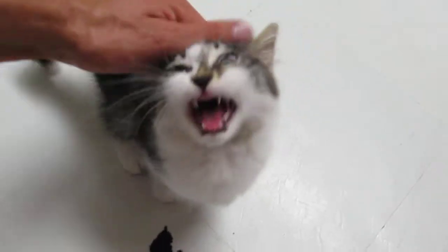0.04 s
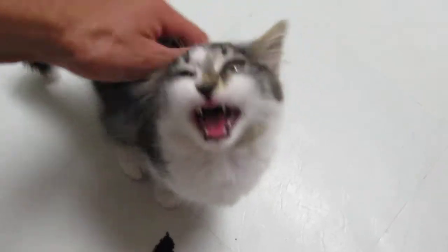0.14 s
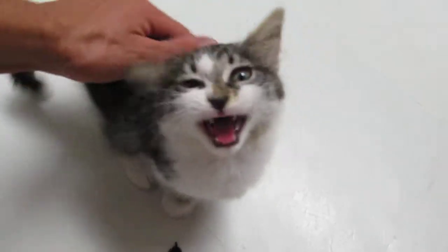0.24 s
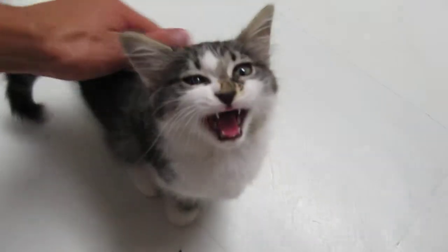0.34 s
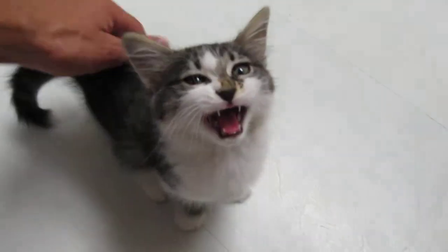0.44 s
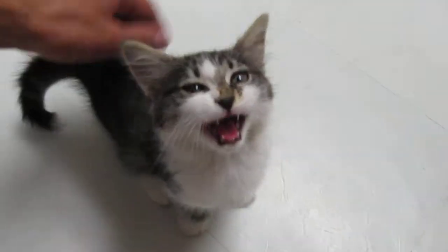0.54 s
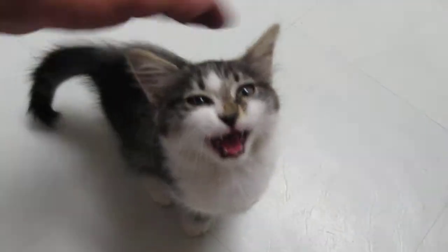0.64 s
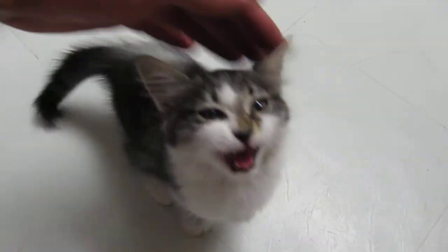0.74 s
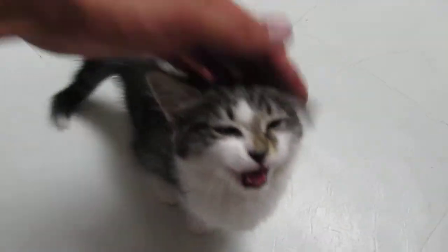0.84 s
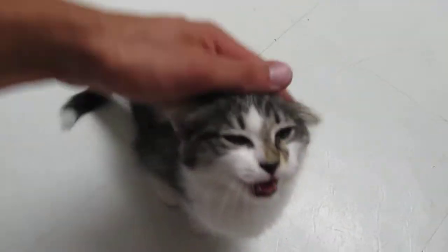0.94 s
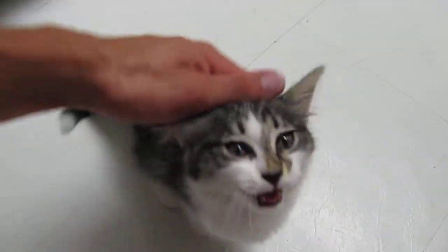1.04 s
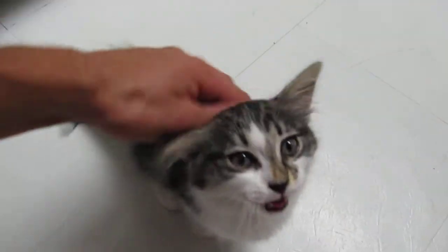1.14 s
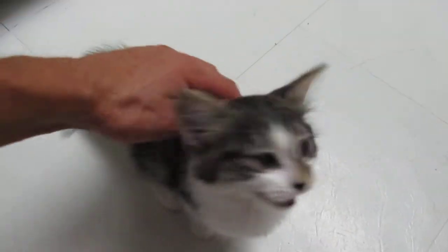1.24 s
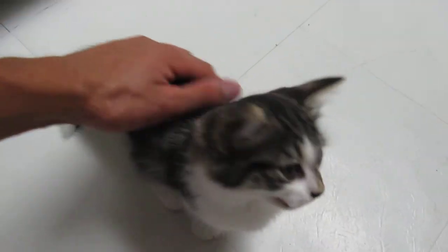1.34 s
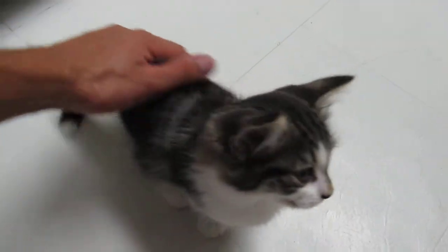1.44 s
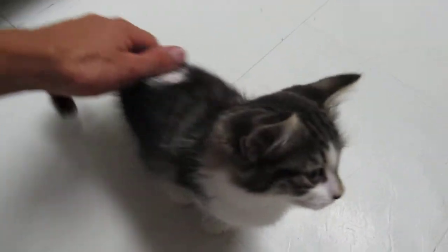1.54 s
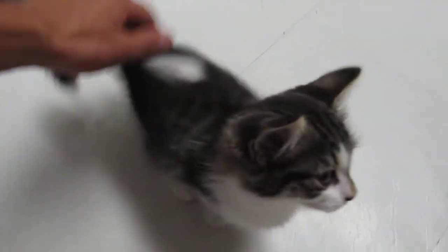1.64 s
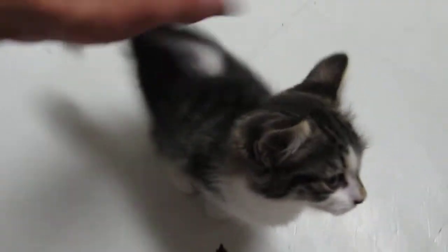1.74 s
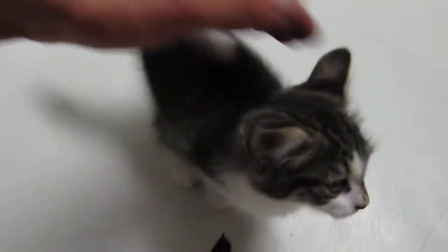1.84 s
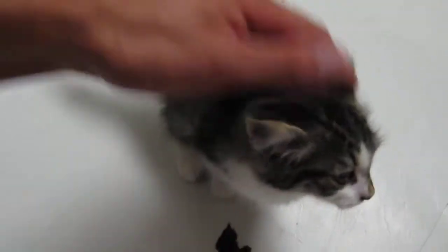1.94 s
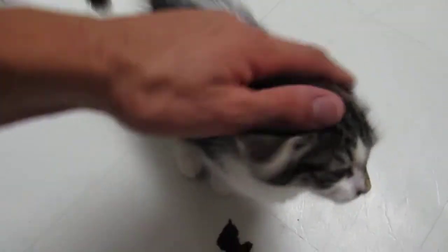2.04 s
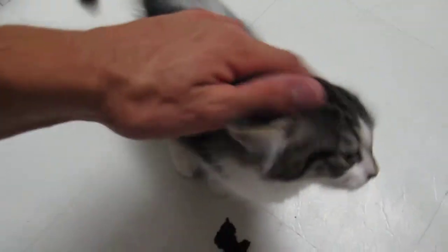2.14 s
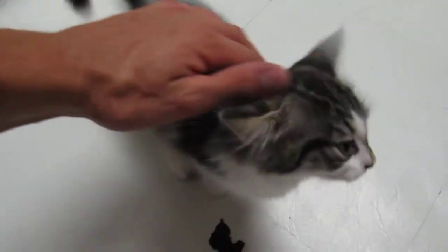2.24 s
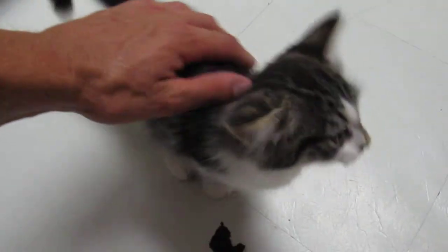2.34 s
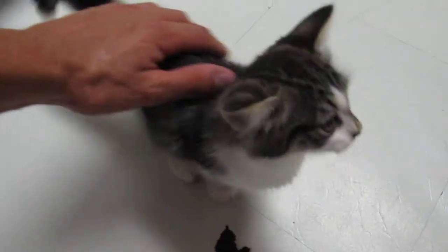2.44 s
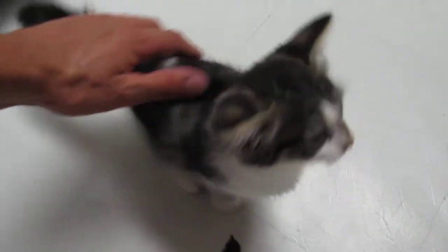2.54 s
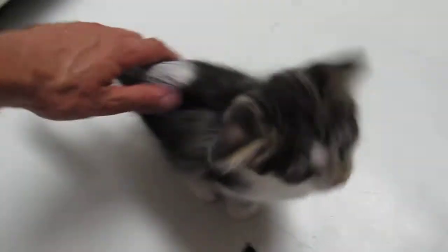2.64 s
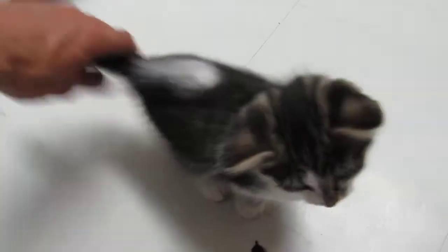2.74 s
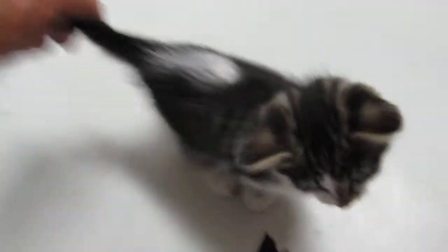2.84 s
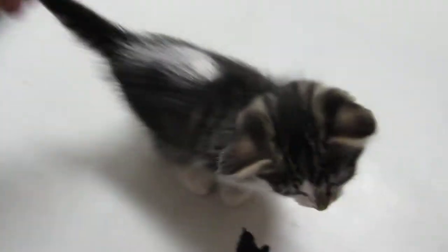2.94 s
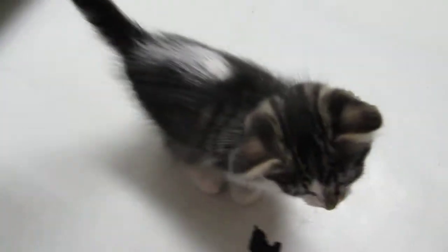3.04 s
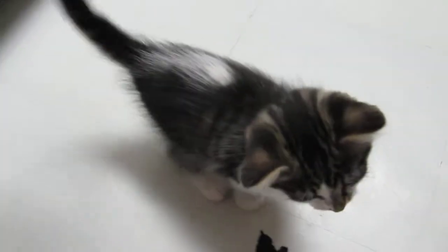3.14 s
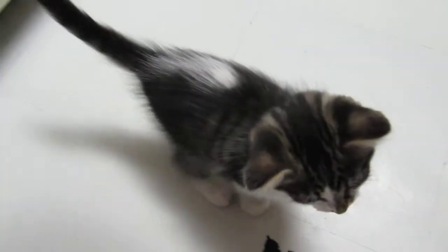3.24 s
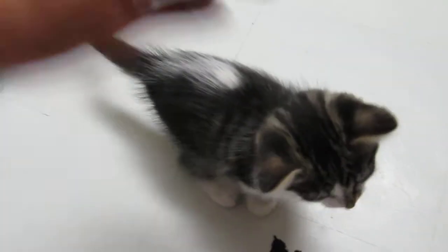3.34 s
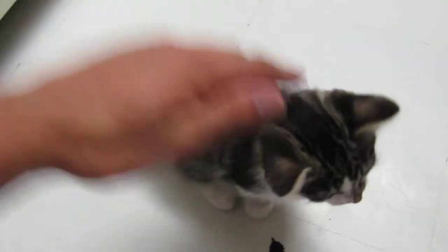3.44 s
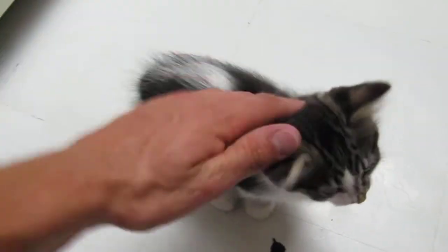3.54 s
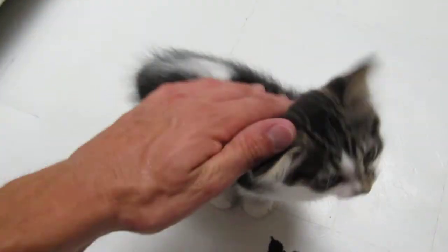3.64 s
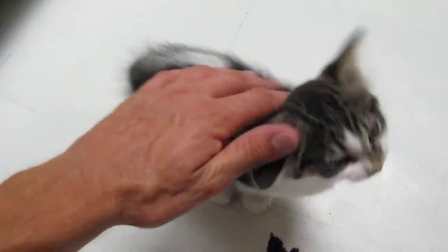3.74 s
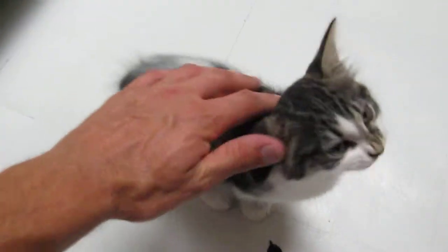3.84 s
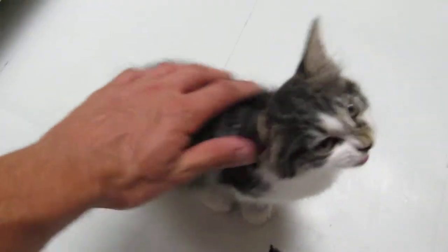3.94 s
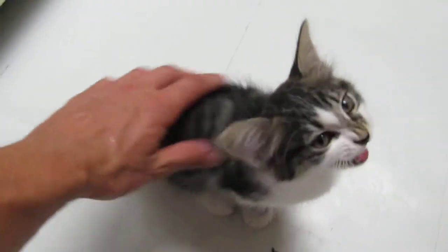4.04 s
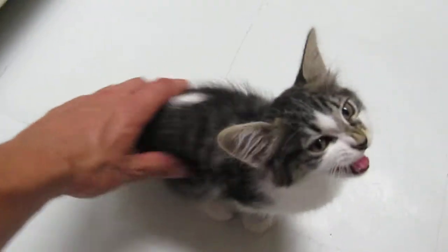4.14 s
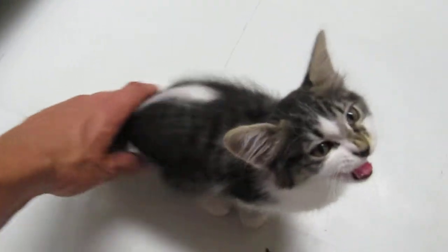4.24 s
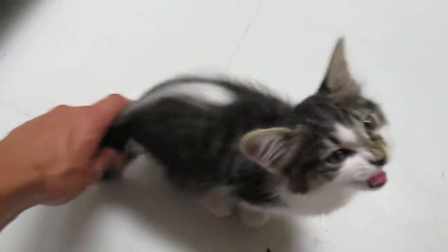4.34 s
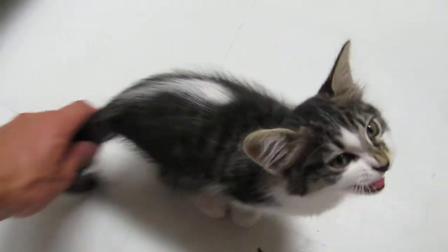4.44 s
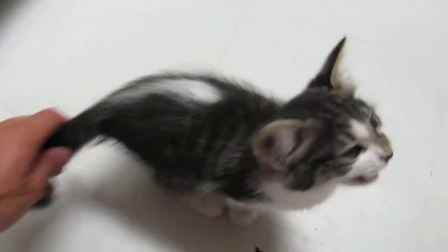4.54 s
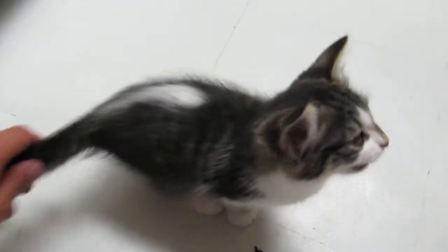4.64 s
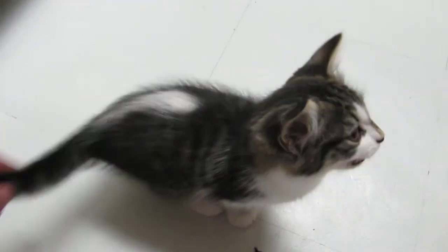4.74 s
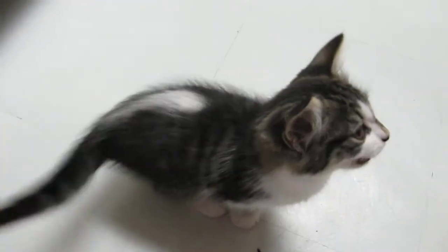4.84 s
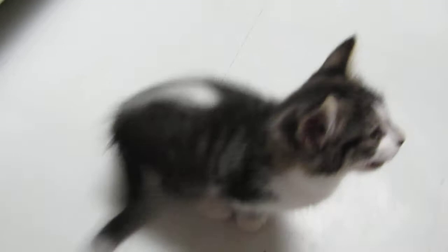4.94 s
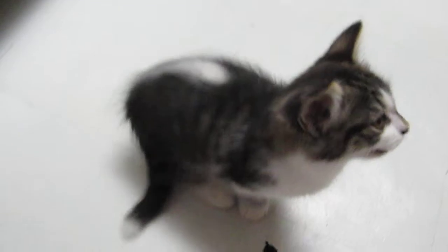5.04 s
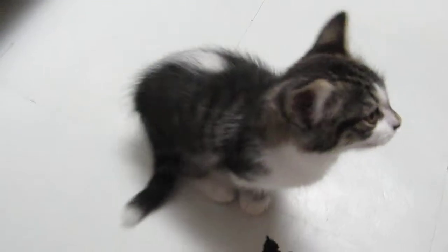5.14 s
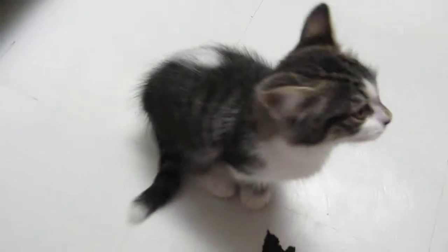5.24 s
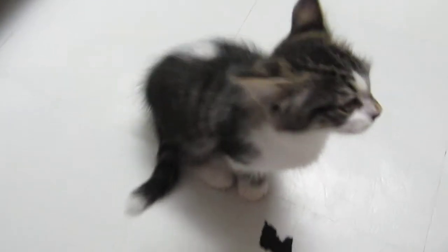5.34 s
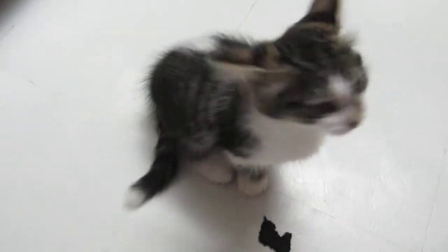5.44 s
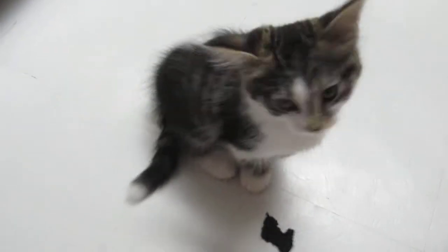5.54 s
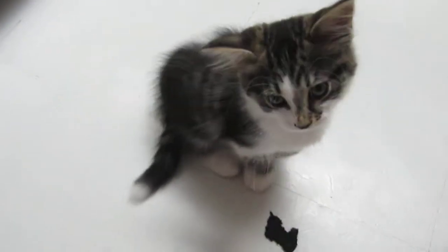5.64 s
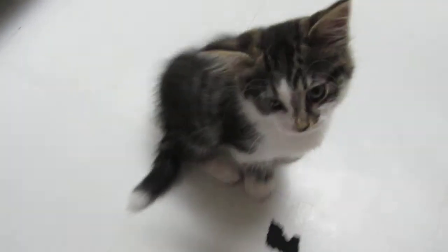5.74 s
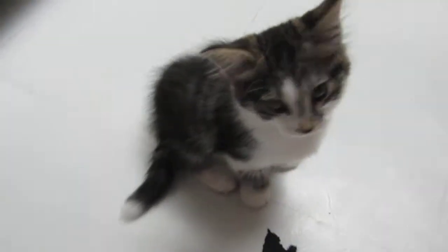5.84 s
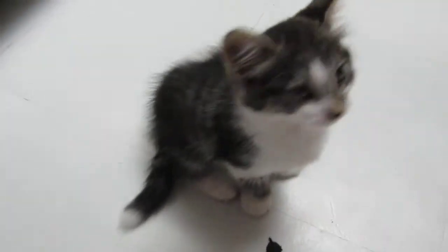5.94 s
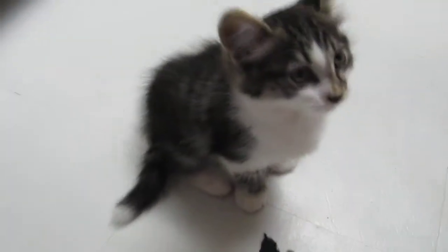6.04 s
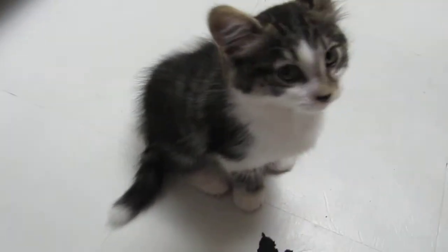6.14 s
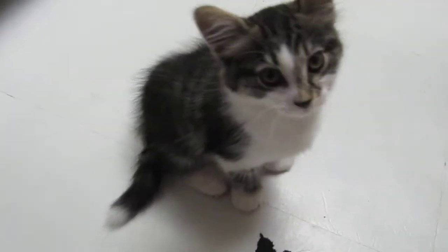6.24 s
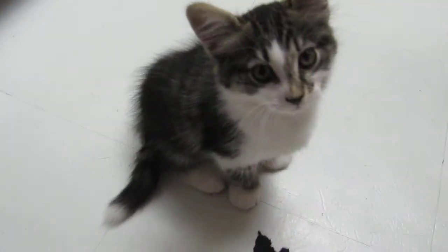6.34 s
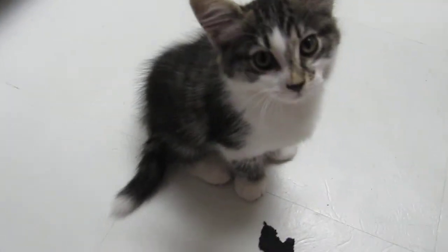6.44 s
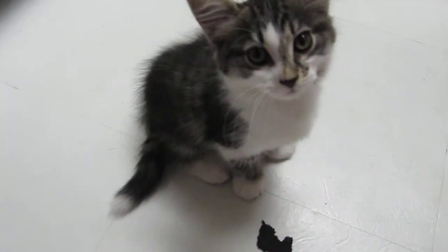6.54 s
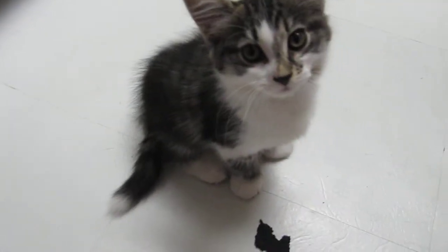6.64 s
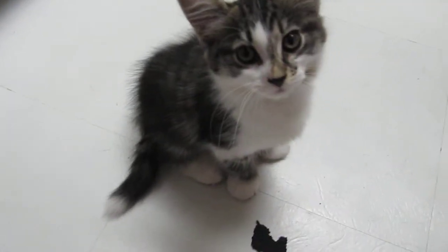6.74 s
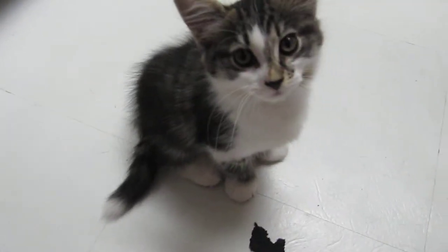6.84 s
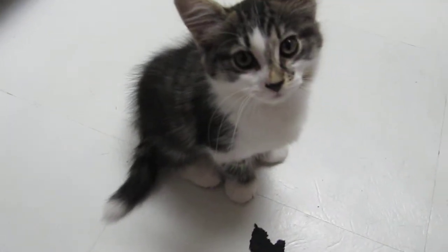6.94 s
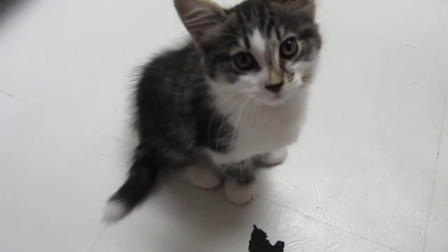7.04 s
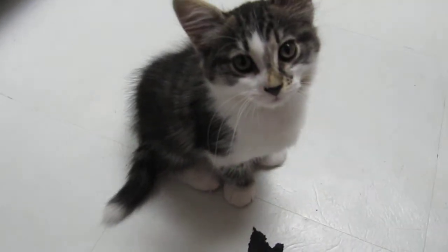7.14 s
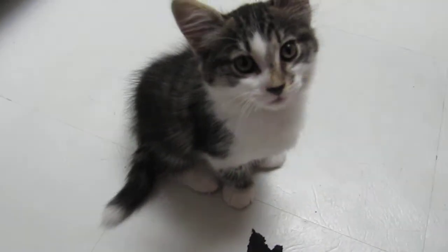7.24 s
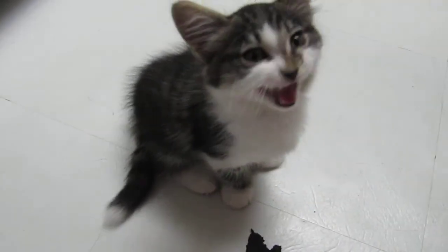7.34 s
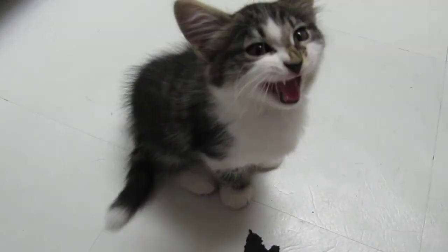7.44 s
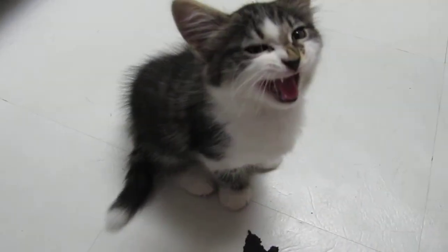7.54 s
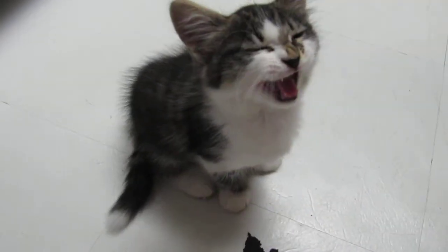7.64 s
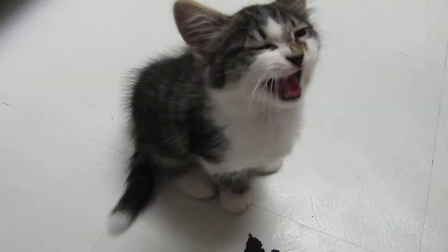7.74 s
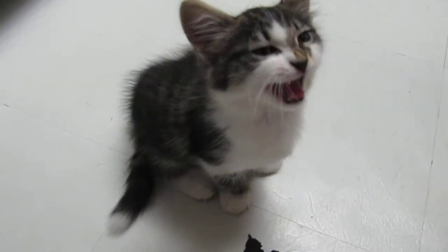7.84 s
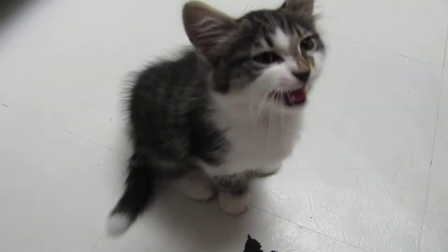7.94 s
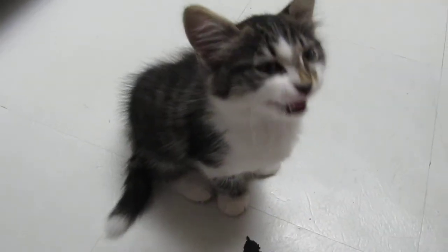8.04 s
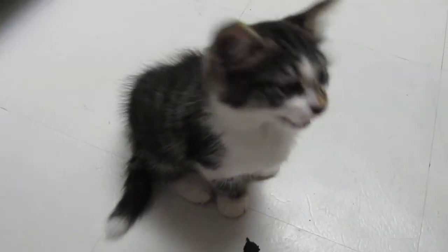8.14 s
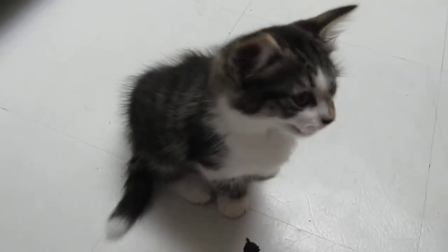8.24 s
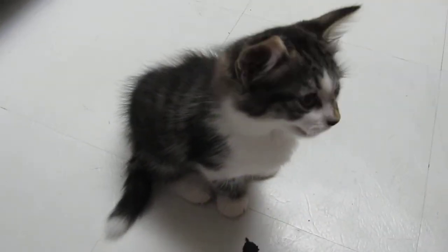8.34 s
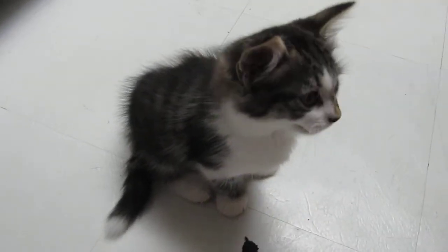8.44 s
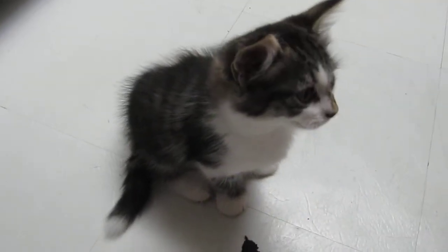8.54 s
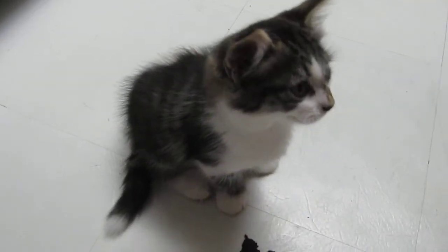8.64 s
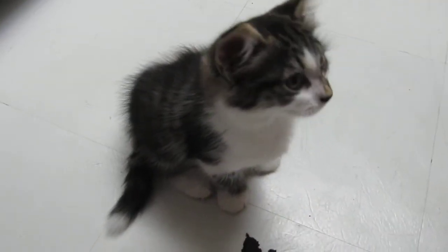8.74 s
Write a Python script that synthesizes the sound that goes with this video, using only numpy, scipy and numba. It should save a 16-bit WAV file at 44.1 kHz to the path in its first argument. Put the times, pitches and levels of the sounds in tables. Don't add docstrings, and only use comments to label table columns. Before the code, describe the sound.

A small kitten meows close to the microphone in a bare, slightly reflective room. The first cry is already under way and falls away; soft hand strokes on fur and small wet mouth ticks follow. A second strong meow comes with a dull knock under it, then a brief rough chirp, a sharp tick and a last falling meow. Low ventilation noise, wavering motor hum and a faint high whine continue throughout.

```python
import sys
import numpy as np
from scipy import signal
from scipy.fft import rfft, irfft
from scipy.io import wavfile
from scipy.ndimage import uniform_filter1d
from numba import njit

SR = 44100
rng = np.random.default_rng(int(sys.argv[2]) if len(sys.argv) > 2 else 0)


def invert_db(x):
    u = np.asarray(x, float) / 20
    return 10 ** u


def store_wav(level_fs):
    pcm = np.round(np.clip(np.atleast_2d(level_fs), -1, 1) * 32767)
    wavfile.write(sys.argv[1], SR, pcm.T.astype(np.int16))


N = 387198


@njit
def svf(x, hz, width):
    y, band_state, low_state = np.empty(len(x)), 0., 0.
    for i in range(len(x)):
        g, k = np.tan(np.pi * hz[i] / SR), width / hz[i]
        v = (band_state + g * (x[i] - low_state)) / (1 + g * (g + k))
        band_state, low_state = 2 * v - band_state, low_state + 2 * g * v
        y[i] = k * v
    return y


def band(x, hz, width, count=2):
    for _ in range(count):
        x = svf(x, hz + np.zeros(len(x)), float(width))
    return x


def walk(rate, size=N):
    hold = max(int(SR / rate), 2)
    levels = np.repeat(rng.standard_normal(size // hold + 1), hold)
    return 1.4 * uniform_filter1d(uniform_filter1d(levels, hold), hold)[:size]


def steady(x):
    power = uniform_filter1d(uniform_filter1d(x ** 2, size=900), size=900)
    return x / np.sqrt(power + 1e-12)


# frequency in Hz, density in dB per Hz.
AIR_SPECTRUM = [(15, -1), (35, -9), (227, -2), (281, -4.5), (399, -5.5), (631, -4.5), (848, -13),
                (1050, -13), (2170, -23), (4150, -25.5), (6040, -30), (7290, -28), (8120, -31), (8800, -26),
                (15500, -46)]
# frequency in Hz, rms level in dB, wobble in dB.
LINES = [(120, -54, 3), (179, -59, 3), (238, -53, 3), (360, -62, 3), (411, -56, 2), (2374, -76, 2),
         (4113, -77, 2), (4172, -77, 2), (7795, -79, 1), (7822, -76, 1), (7854, -72, 2), (7881, -66, 1),
         (7940, -75, 1), (8000, -78, 1)]
# time in seconds, level in dB.
MOTOR_LOAD = [(0.0, -60), (0.12, -57), (1.3, -55), (1.96, -47.5), (2.2, -56), (3.06, -48), (3.42, -63),
              (3.62, -51), (4.5, -61), (4.96, -49), (5.31, -57), (6.11, -49), (6.68, -60), (6.92, -52),
              (7.36, -50.5), (7.68, -61), (7.82, -52), (8.78, -55)]
AIR_DB, MOTOR_HZ = -45, 59.2


def hum():
    hz = np.maximum(np.fft.rfftfreq(N, 1 / SR), 1)
    corner_hz, density_db = np.transpose(AIR_SPECTRUM)
    colour = invert_db(np.interp(np.log(hz), np.log(corner_hz), density_db))
    air = irfft(rfft(rng.standard_normal(N)) * colour, N) * invert_db(.5 * walk(1.68))
    out = air * invert_db(AIR_DB) / np.std(air)
    t = np.arange(N) / SR
    for hz, db, wobble_db in LINES:
        level = np.sqrt(2) * invert_db(db + wobble_db * walk(6.0))
        out += level * np.sin(2 * np.pi * hz * t + wobble_db / 2 * walk(10))
    throb = invert_db(np.interp(t, *np.transpose(MOTOR_LOAD)) + 0.6)
    return out + np.sqrt(2) * throb * np.sin(2 * np.pi * MOTOR_HZ * t + 0.56 * walk(2.14))


# start in seconds, peak level in dB, frequency in Hz.
TICKS = [
    (2.055, -38, 2870),
    (2.2513, -23, 3470),
    (4.996, -29, 8970),
    (7.2467, -17, 3100),
    (8.401, -31, 4610),
]


def ticks():
    out, t = np.zeros(N), np.arange(8000) / SR
    for s, db, hz in TICKS:
        decay = invert_db(db - 60 * t / .02)
        tick = band(rng.standard_normal(len(t)) * decay, hz, .8 * hz)
        out[int(s * SR):int(s * SR) + len(t)] += 0.55 * tick
    return out


KNOCK_S = 4.258
# level in dB, frequency in Hz, 60 dB decay time in seconds.
KNOCK = (-28, 75, 0.054)


def knock():
    out, t = np.zeros(N), np.arange(8000) / SR
    db, hz, t60 = KNOCK
    crack = band(rng.standard_normal(len(t)), 10500, 14000, count=1) * invert_db(-5 - 60 * t / 0.03)
    start = int(KNOCK_S * SR)
    out[start:start + len(t)] += (np.sin(2 * np.pi * hz * t) + crack) * invert_db(db - 60 * t / t60)
    return out


# peak in seconds, level in dB, length in seconds, centre in Hz.
STROKES = [
    (1.299, -60, 0.065, 4970),
    (1.413, -56.5, .15, 6930),
    (2.002, -58, .2, 7770),
    (2.16, -60, .08, 7800),
    (2.312, -46, 0.27, 7350),
    (2.627, -40.5, 0.19, 8100),
    (2.792, -46, 0.14, 6900),
    (5.014, -48.5, 0.086, 4930),
]
STROKE_RISE, STROKE_EDGE_DB = 0.38, -21.5


def fur():
    out = np.zeros(N)
    lead = 8000
    t = np.arange(-lead, 12000) / SR
    for s, db, length, hz in STROKES:
        off_peak = t / length / np.where(t < 0, STROKE_RISE, 1 - STROKE_RISE)
        grains = rng.standard_normal(len(t)) * invert_db(1.1 * walk(300, size=len(t)))
        hiss = band(grains, hz, 13600, count=3) + invert_db(1.5) * band(grains, 4050, 5000, count=1)
        start = int(s * SR) - lead
        out[start:start + len(t)] += invert_db(db + STROKE_EDGE_DB * off_peak ** 2) * steady(hiss)
    return out


# start in seconds, roughness from 0 to 1.
REGISTERS = [(0, .13), (.325, .24), (.385, .07), (.47, .18), (.52, .09), (.63, .05), (.86, .2), (.92, .07),
             (1.3, .3), (3.635, .09), (3.72, .4), (3.815, .6), (3.975, .45), (4.075, .1), (4.39, .045),
             (4.82, .12), (4.9, .3), (5.5, .85), (5.82, .25), (5.895, .75), (5.93, .25), (5.995, .45),
             (6.04, .7), (6.08, .06), (7, .45), (7.38, .48), (7.5, .68), (7.625, .36), (7.69, .05),
             (8.05, .17)]
# start in seconds, end in seconds, dB against the main partials.
DOUBLINGS = [(0, .4, -2.5), (.4, 0.469, -11), (.46, 0.505, -5), (.5, 0.627, -14), (.86, 0.908, -9),
             (0.973, 1.1, -6), (1.11, 1.167, -0.5), (3.813, 4.153, 4), (4.15, 4.392, -7),
             (5.89, 5.928, -12), (5.965, 6.078, -4.5), (7.375, 7.503, -8), (7.506, 7.635, 1.5),
             (7.63, 7.696, -8.5)]
LOCKED_DB, SLIP_S = -38, 0.012


def folds(t, hz):
    size = len(t)

    def slide(v):
        return uniform_filter1d(v, size=max(int(SLIP_S * SR), 1))

    since, roughness = np.transpose(REGISTERS)
    rough = slide(roughness[np.searchsorted(since, t, "right") - 1])
    doubling_db = np.full(size, 1. * LOCKED_DB)
    for s0, s1, db in DOUBLINGS:
        doubling_db[(t >= s0) & (t < s1)] = db
    doubling = invert_db(slide(doubling_db))
    hops = uniform_filter1d(np.repeat(rng.standard_normal(size // 800 + 1), 800)[:size], size=150)
    jitter = 1 + .003 * walk(60, size=size) + .022 * rough * hops
    phase = np.pi * np.cumsum(hz * jitter) / SR
    shaken = phase + (.008 + .1 * rough) * walk(500, size=size)
    pulses = 0
    for k in range(1, 58):
        looseness = min(k / 8, 1)
        scatter = rough * looseness ** 2
        drift = invert_db(2.2 * looseness * walk(12, size=size) + 6 * scatter * walk(250, size=size))
        slip = rng.uniform(0, 3) + 1.5 * scatter * walk(300, size=size)
        level = doubling * min(k / 5, 1) if k % 2 else 1
        pulses = pulses + level * (k * hz < 32000) * drift * np.cos(k * shaken + slip)
    leak = (1 + .6 * np.cos(2 * phase)) * (.25 + 3.7 * rough ** 2)
    air = rng.standard_normal(size) * leak
    return pulses * invert_db(3 * rough * walk(200, size=size)) + air


TAIL_TOP = 0.62


def vocal_tract(source, hz, mouth_hz, lost_db, gape, teeth_hz):
    gape_db, gape_hz, top_db, third_db, nose_hz = gape
    mouth = band(source, mouth_hz, 955, count=3) + invert_db(gape_db) * band(source, gape_hz, 1510, count=3)
    throat = band(source, 2 * hz, 1090) - invert_db(third_db) * band(source, 3 * hz, 220)
    throat = throat + invert_db(-7.5) * band(source, hz, 200)
    nose = band(source, nose_hz, 3310, count=3)
    breath = source + 0.85 * rng.standard_normal(len(source))
    teeth = band(breath, teeth_hz, 4300, count=6) + invert_db(-8) * band(breath, 8700, 3200, count=3)
    teeth = teeth + invert_db(top_db + TAIL_TOP * lost_db) * band(breath, 13500, 2600)
    return steady(mouth), steady(throat), steady(nose), steady(teeth)


def played(table):
    s, *columns = np.transpose(table)
    t = np.arange(int(s[0] * SR), int(s[-1] * SR)) / SR
    under_way = s[0] < .001
    edge = np.clip(np.minimum(t - s[0] + under_way, s[-1] - t) / .008, 0, 1)
    return int(s[0] * SR), t, edge, [np.interp(t, s, c) for c in columns]


# time in seconds, effort in dB, mouth resonance in Hz (opening),
# throat over mouth in dB (jaw closure).
MEOWS = [
    [(0.0, -30, 3040, -5.5), (0.12, -26.5, 2990, -9), (0.42, -25, 3030, -12), (0.66, -32, 2576, -6),
     (0.8, -35, 2524, -7.5), (0.934, -41, 2800, -5.5), (1.064, -38, 2810, -16), (1.23, -39.5, 2703, -7.5),
     (1.4, -63.5, 2494, 9)],
    [(3.6, -63, 3020, 14), (3.66, -36.5, 3300, -17), (3.784, -27.5, 3140, -14), (4.012, -24.5, 3530, -12),
     (4.274, -24.5, 3000, -13), (4.516, -27, 2970, -13), (4.63, -40, 2860, 2), (4.842, -41.5, 2500, -6),
     (4.97, -56, 2500, -2)],
    [(7.268, -44, 3200, -7), (7.31, -31.5, 3830, -17.5), (7.4, -28, 3720, -13), (7.64, -25, 3220, -12.5),
     (7.87, -27.5, 2830, -8.5), (7.94, -38, 2650, 2), (8.05, -40, 2440, -7), (8.1, -46.5, 2580, -1.5),
     (8.41, -62, 2200, 7)],
]
CHIRP = [
    [(5.73, -72, 2300, 13), (5.79, -56, 2500, 10), (5.82, -46.5, 2160, 2), (5.846, -37.5, 2250, -2),
     (5.87, -60, 2200, 6)],
    [(5.87, -58, 2160, 12), (5.892, -37.5, 2180, 1), (5.908, -26, 2250, -14), (5.93, -31.5, 2440, -4.5),
     (5.964, -25.5, 2970, -15), (5.99, -29.5, 2820, -12), (6.005, -26.5, 2650, -22),
     (6.06, -32.5, 2620, -14), (6.078, -38, 2690, -12)],
    [(6.078, -52, 2600, 1), (6.184, -59, 2680, 9), (6.255, -75, 2640, 19), (6.28, -78, 2720, 5)],
]
# time in seconds, pitch in Hz.
PITCH = [
    [(0.05, 697), (0.2, 733.7), (0.46, 729.4), (0.5, 702.6), (0.63, 645), (0.84, 597), (0.9, 596),
     (1.0, 574), (1.276, 578.3)],
    [(3.66, 630), (3.72, 622), (3.814, 808), (4.0, 793.7), (4.235, 693), (4.33, 736.3), (4.52, 720.7),
     (4.6, 675), (4.8, 621)],
    [(7.315, 609.5), (7.361, 641), (7.387, 732), (7.57, 784.6), (7.63, 736), (7.77, 727), (7.96, 636.5),
     (8.2, 524.7), (8.42, 468)],
    [(5.72, 518), (5.826, 533), (5.87, 576)],
    [(5.87, 595), (5.92, 586), (5.958, 641), (5.99, 650), (6.01, 725), (6.06, 705), (6.078, 740)],
    [(6.078, 827), (6.178, 848), (6.2, 892), (6.3, 890)],
]
# second mouth resonance in dB, its frequency in Hz, top air in dB,
# third partial in dB, nose resonance in Hz.
GAPE = [
    (-8, 3680, -24, 2.5, 5000),
    (-3.5, 3340, -28, -1, 5100),
    (-6, 3300, -25, 1.5, 5030),
    (-13, 3150, -38, -17, 5900),
    (1.5, 2420, -38, -21, 5730),
    (2, 4340, -38, -24, 6200),
]
# nose in dB and teeth in dB at full effort,
# dB the nose and dB the teeth win per dB of lost effort, teeth resonance in Hz.
TRACT = [
    (-14, -15.5, 0.17, 0.22, 10840),
    (-12, -16.5, 0.079, 0.081, 10700),
    (-9.5, -14.5, .1, 0.17, 10940),
    (-34, -40, 0, 0, 10500),
    (-17.5, -29.5, 0.057, 0, 9900),
    (-12, -32, .15, .1, 10500),
]
# time in seconds, pitch bump in Hz, effort bump in dB, half width in seconds.
QUAVERS = [(0, 24, -1.5, 0.034), (0.138, 10, 0, 0.013), (0.251, -9, 0, 0.033), (0.351, -7, 1.5, 0.014),
           (.485, -14.5, 1, 0.013), (.535, 1, -1.5, .01), (.57, 12, 0.5, 0.031), (.835, -12, -1.5, 0.018),
           (1.125, 20.5, 1.5, .035), (1.36, -60.5, -0.5, .06), (3.66, 10.5, 4, 0.016),
           (3.734, 25.5, -1.5, 0.0122), (3.774, -25, -2, 0.017), (3.8, 5.5, 2.5, .012),
           (3.858, -25, -1, .015), (4.12, 0, 0, 0.046), (4.225, -1, -4, 0.077), (4.845, -24.5, -0.5, 0.035),
           (4.915, -23, 1, 0.0154), (7.396, 9, 3, 0.011), (7.42, -20.5, 0.5, .02), (7.59, -11, -1, 0.027),
           (7.66, -0.5, 0.5, .02), (7.76, -4, 0.5, 0.014), (7.8, 9, 1.5, 0.021), (7.855, 0, 0, 0.011),
           (7.99, 9, 2.5, 0.02), (8.094, -19.5, -1, 0.025), (8.13, 12, 0, 0.013), (8.28, 8, 5, 0.0506)]
RISE_HZ_PER_S, SAG_HZ_PER_S = 2300, 700
FULL_DB = -25
BITE_DB, BITE_S = 6, 0.13


def kitten():
    out = np.zeros(N)
    for cry, pitch, gape, tract in zip(MEOWS + CHIRP, PITCH, GAPE, TRACT):
        start, t, edge, (db, mouth_hz, throat_db) = played(cry)
        s, pitch_hz = np.transpose(pitch)
        early = np.clip(s[0] - t, 0, 1) * (start > 0)
        late = np.clip(t - s[-1], 0, 1)
        hz = np.interp(t, s, pitch_hz) - RISE_HZ_PER_S * early - SAG_HZ_PER_S * late
        hz = np.maximum(hz, 480)
        for s, bump_hz, bump_db, half in QUAVERS:
            bump = np.exp(-((t - s) / half) ** 2)
            hz, db = hz + bump_hz * bump, db + bump_db * bump
        lost_db = FULL_DB - db
        bite_db = BITE_DB * np.exp(-(t - t[0]) / BITE_S)
        full_nose_db, full_teeth_db, nose_share, teeth_share, teeth_hz = tract
        nose_db = full_nose_db + nose_share * lost_db + bite_db
        teeth_db = full_teeth_db + teeth_share * lost_db + bite_db
        mouth, throat, nose, teeth = vocal_tract(folds(t, hz), hz, mouth_hz, lost_db, gape, teeth_hz)
        voice = mouth - invert_db(throat_db) * throat - invert_db(nose_db) * nose + invert_db(teeth_db) * teeth
        out[start:start + len(t)] += edge * invert_db(db) * voice
    return out


ROOM_T60_S, ROOM_DB = 0.15, -12


def room(near):
    t = np.arange(SR // 2) / SR
    decay = invert_db(-60 * t / ROOM_T60_S) * (t > .004)
    tail = band(rng.standard_normal(len(t)), 3700, 13500, count=1) * decay
    echo = signal.fftconvolve(near, tail / np.sqrt(np.sum(tail ** 2)))[:N]
    return invert_db(ROOM_DB) * echo


def scene():
    near = ticks() + knock() + fur() + kitten()
    return np.tile(near + room(near) + hum(), (2, 1))


def top_cut(x):
    return signal.sosfilt(signal.butter(12, 15640, fs=SR, output="sos"), x)


def record(dry):
    return top_cut(dry)


dry = scene()
out = record(dry)
store_wav(out)
```